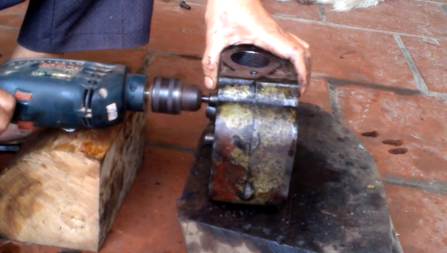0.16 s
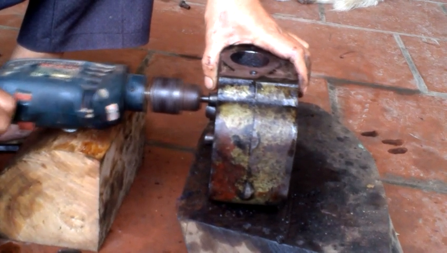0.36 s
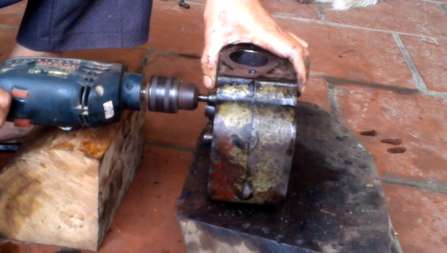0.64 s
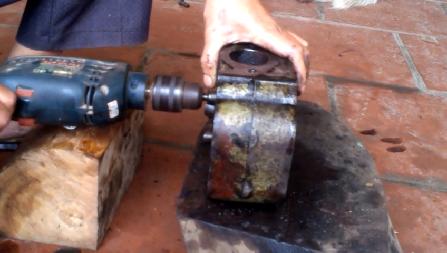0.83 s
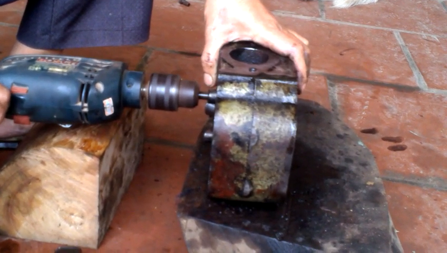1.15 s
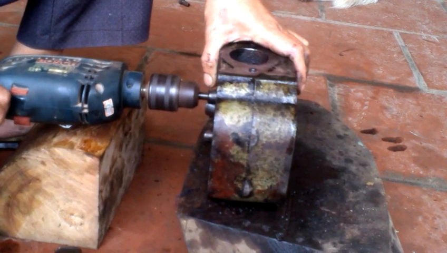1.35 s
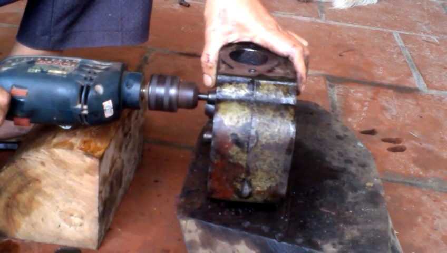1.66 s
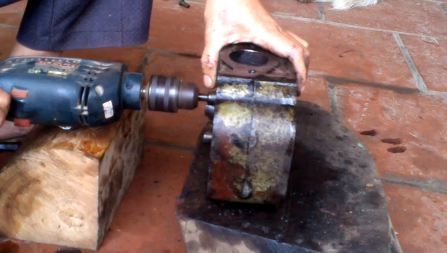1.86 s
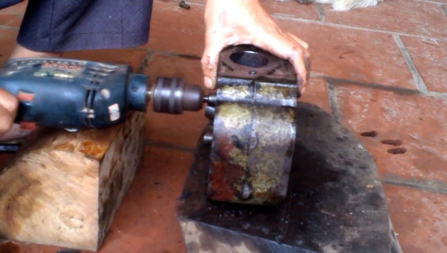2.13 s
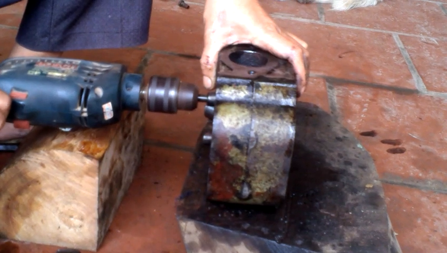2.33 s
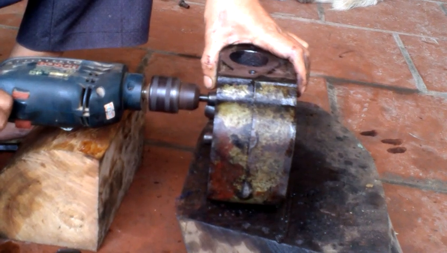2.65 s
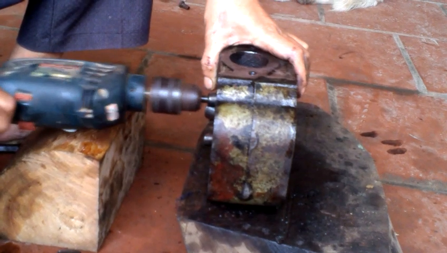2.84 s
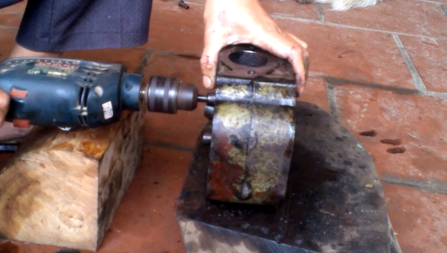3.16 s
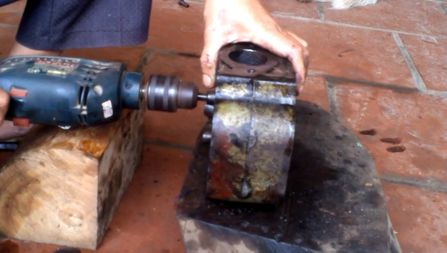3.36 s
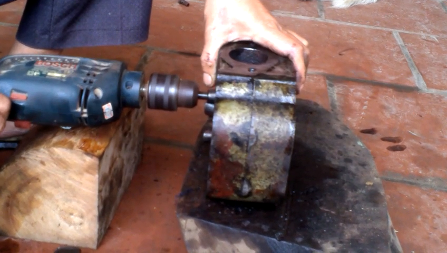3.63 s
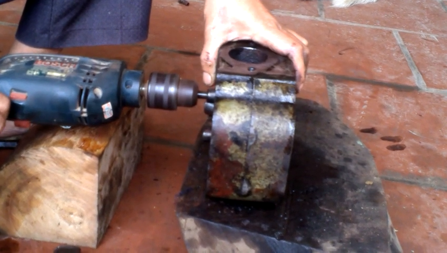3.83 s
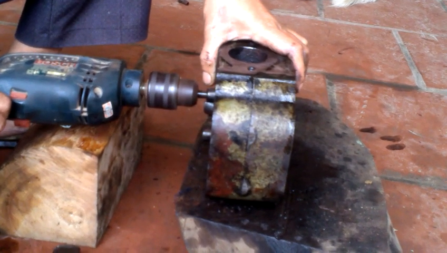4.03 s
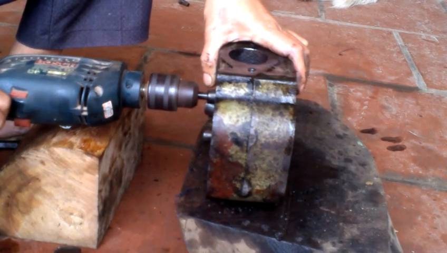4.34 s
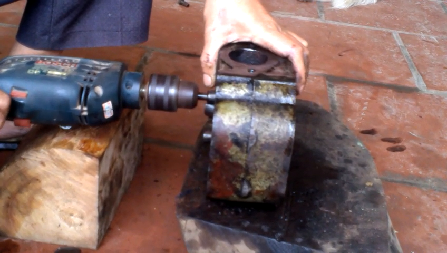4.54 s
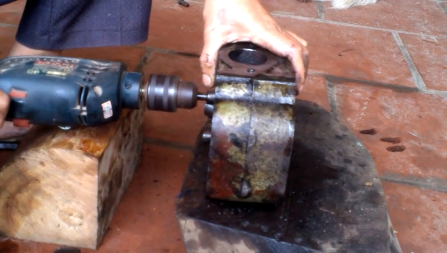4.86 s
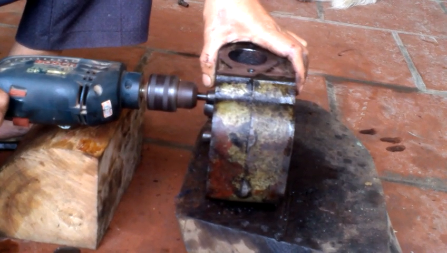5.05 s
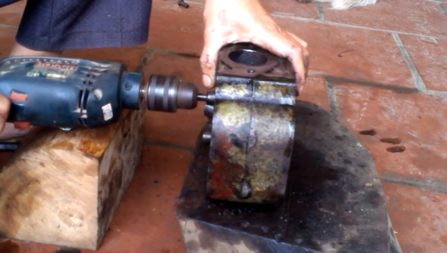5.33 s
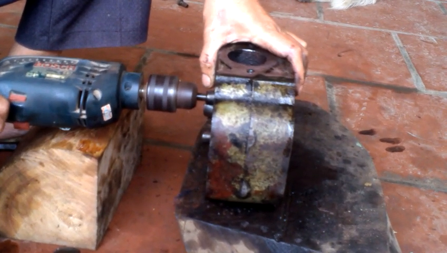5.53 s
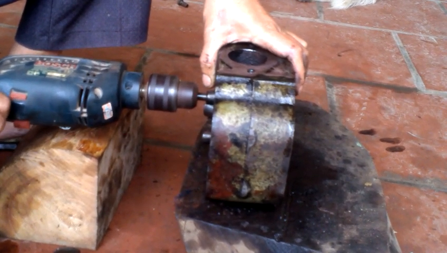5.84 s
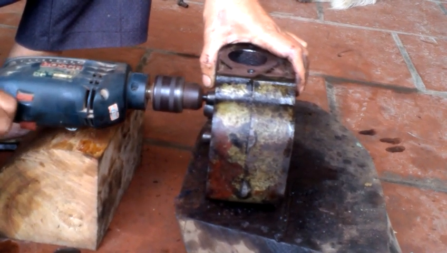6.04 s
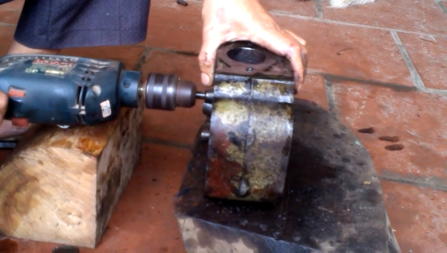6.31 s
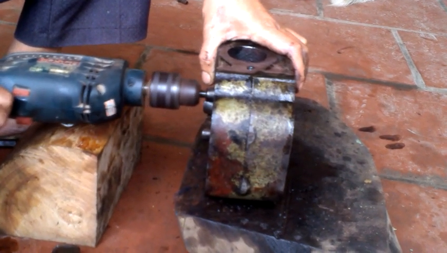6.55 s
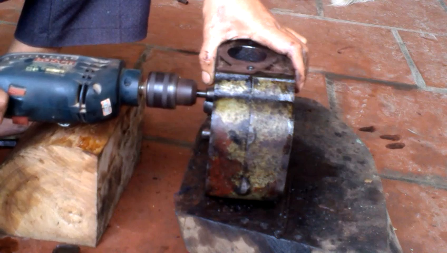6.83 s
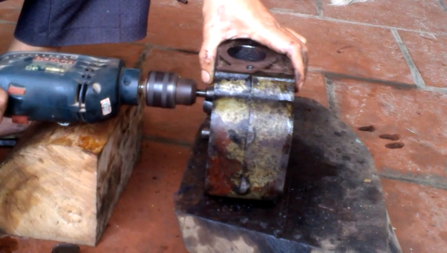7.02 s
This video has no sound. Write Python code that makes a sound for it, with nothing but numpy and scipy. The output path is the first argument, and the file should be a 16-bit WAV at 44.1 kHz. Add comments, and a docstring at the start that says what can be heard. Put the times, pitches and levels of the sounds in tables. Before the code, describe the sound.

A hand drill runs continuously close by, a harsh rushing roar with a slightly sagging whine, while a metal valve knocks lightly on its seat now and then.

```python
"""A hand drill spins a valve against its seat in a cylinder head, heard by a phone microphone close by.
Its armature whines in sine tones on multiples of its turning rate, which sags as the hand pushes.
Fan air, gears and grit roar through the housing: coloured noise that flutters and echoes briefly.
The valve knocks on its seat now and then, each blow a few fast-fading sines.
Far off, a slow engine hums in low tones over soft filtered noise."""
import sys
import numpy as np
from scipy import signal
from scipy.fft import rfft, irfft
from scipy.io import wavfile
from scipy.ndimage import uniform_filter1d

SR = 44100
rng = np.random.default_rng(int(sys.argv[2]) if len(sys.argv) > 2 else 0)


def wav_record(signal):
    """Record a signal, one row per channel, as 16-bit PCM in the file named by sys.argv[1]."""
    frames = np.transpose(np.atleast_2d(signal))
    bounded = np.clip(frames, -1, 1)
    # unit amplitude maps onto the largest positive 16-bit level
    quanta = np.round(bounded * 32767).astype(np.int16)
    wavfile.write(sys.argv[1], SR, quanta)


N = 316633
TIME = np.arange(N) / SR
FREQ = np.arange(N // 2 + 1) * SR / N + 1  # Hz, lifted by 1 so that its logarithm exists
FREE_HZ = 420  # armature turns per second from which sag is counted
PINION_TEETH, GEAR_TEETH = 4, 42


def undb(db):
    """Turn decibels into a plain factor."""
    return 10 ** (np.asarray(db) / 20)


def unit(x):
    """Scale to an rms (average strength) of 1."""
    return x / np.sqrt(np.mean(x ** 2))


def walk(rate):
    """A random wobble of rms 1: about `rate` new values per second, smoothed twice."""
    hold = int(SR / rate)
    steps = np.repeat(rng.standard_normal(N // hold + 1), hold)[:N]
    smooth = uniform_filter1d(steps, hold)
    return unit(uniform_filter1d(smooth, hold))


def follow(times, values):
    """Draw straight lines between the points of a table, one value per sample."""
    return np.interp(TIME, times, values)


def filtered(x, gain):
    """Multiply each frequency of a sound by its gain."""
    return irfft(rfft(x) * gain, N)


def bell(hz, width):
    """Bell curve over frequency: 1 at its centre, one half at half a width (Hz) to either side."""
    return 1 / (1 + (2 * (FREQ - hz) / width) ** 2)


def highpass(x, hz):
    """Take away what lies below hz."""
    return signal.sosfilt(signal.butter(3, hz, "high", fs=SR, output="sos"), x)


def tone(turns, multiple, db, slip=0):
    """A sine locked to a turning part, db is its rms level; slip in cycles blurs its pitch."""
    cycles = multiple * turns + slip + rng.random()
    return np.sqrt(2) * undb(db) * np.sin(2 * np.pi * cycles)


def chuck_turns(turns):
    """The gears slow the armature down, so the chuck makes fewer turns."""
    return turns * PINION_TEETH / GEAR_TEETH


# Pace of the far engine. Each row: time in seconds, engine cycles per second.
ENGINE_PACE = [(0, 17.15), (1, 17.3), (1.8, 17.25), (2.8, 16.9), (3.3, 16.8), (4, 16.45), (4.8, 16.72),
               (7.18, 16.5)]
# Low hum tones. Each row: multiple of the engine cycle, usual level in dB.
LOW_HUM = [(5, -81), (6, -79), (7, -80), (8, -76), (9, -82.5), (12, -83)]
# Moments when one low tone swells.
# Each row: multiple of the engine cycle, swell in dB, loudest at (seconds), spread in time (seconds).
HUM_SWELLS = [(6, 12, 1.2, 0.18), (8, 6, 1.1, .5), (6, 15, 2.16, 0.52), (12, 17, 2.8, .5),
              (7, 11, 2.8, 0.66), (8, 12, 3.2, 0.38), (5, 16, 3.75, .3), (9, 16, 3.5, .45),
              (7, 12, 4.2, .4), (7, 15, 5.55, 0.23)]
# Upper hum tones. Each row: multiple of the engine cycle, dB over the mean level of the low tones.
UPPER_HUM = [(13, 0), (14, 2), (16, 4.5), (18, 8), (19, 10)]


def engine():
    """A slow engine hums on multiples of its cycle; a boom and a rumble of noise follow its mean level."""
    cycles = np.cumsum(follow(*np.transpose(ENGINE_PACE))) / SR
    low_db = {round(multiple): db + 0 * TIME for multiple, db in LOW_HUM}
    for multiple, swell_db, loudest_s, spread_s in HUM_SWELLS:
        swell = np.exp(-((TIME - loudest_s) / spread_s) ** 2 / 2)
        low_db[round(multiple)] = low_db[round(multiple)] + swell_db * swell
    mean_db = np.mean(list(low_db.values()), axis=0)

    hum = np.zeros(N)
    for multiple, db in low_db.items():
        hum += tone(cycles, multiple, db + 2.2 * walk(4.03) + 1.2 * walk(8))
    for multiple, db in UPPER_HUM:
        hum += tone(cycles, multiple, mean_db + db + 3.1 * walk(5), slip=0.16 * walk(8))
    boom = unit(filtered(rng.standard_normal(N), bell(314.5, 31)))
    rumble = unit(filtered(rng.standard_normal(N), bell(120, 110)))
    return hum + undb(mean_db + 13) * boom + undb(mean_db + 2.5) * rumble


def yard(x, wet_db=-15, t60_s=.15):
    """Floor tiles, block and walls return a short scatter of echoes: noise that fades by 60 dB in t60_s."""
    t = np.arange(SR // 6) / SR
    fade = np.exp(-np.log(1000) * t / t60_s)
    tail = rng.standard_normal(len(t)) * fade * (t > .002)  # no echo in the first 2 ms
    tail *= undb(wet_db) / np.sqrt(np.sum(tail ** 2))
    echoes = signal.fftconvolve(x, tail)[:N]
    return (x + echoes) / np.sqrt(1 + undb(wet_db) ** 2)


# Blows of the valve on its seat. Each row: start in seconds, strength in dB.
VALVE_KNOCKS = [(0.456, -22), (1.063, -20), (2.372, -19), (2.961, -19), (4.393, -24), (4.93, -20),
                (6.199, -20), (6.817, -20.5)]
# Ringing of the cylinder head.
# Each row: pitch in Hz, level in dB against the strength of the blow, seconds to fade by 60 dB.
HEAD_RINGS = [(620, -13, .03), (760, -17, .025), (910, -8, .05), (965, -1, .065), (1350, -7, .015),
              (1950, 3, 0.013), (2420, 1, 0.0082), (3300, -1, .006)]


def knocks(rise_s=0.00027):
    """Each blow rings the head briefly, a little differently every time; it radiates little bass."""
    out = np.zeros(N)
    t = np.arange(SR // 8) / SR
    rise = 1 - np.exp(-t / rise_s)
    for start_s, strength_db in VALVE_KNOCKS:
        ring = np.zeros(len(t))
        for hz, db, t60_s in HEAD_RINGS:
            level_change, pitch_change = rng.standard_normal(2)
            varied_hz = hz * (1 + 0.0066 * pitch_change)
            fade = np.exp(-np.log(1000) * t / t60_s)
            ring += undb(db + 0.56 * level_change) * np.sin(2 * np.pi * varied_hz * t) * fade
        first = int(start_s * SR)
        out[first:first + len(t)] += undb(strength_db) * ring * rise
    return highpass(out, 500)


def chuck_tones(hz, turns):
    """The chuck runs out of true and shakes the drill at 4 and 8 times its turn, the 8th harder under load."""
    spin = chuck_turns(turns)
    fourth_db = -77 + 4 * walk(3.1)
    eighth_db = -65 + .35 * (FREE_HZ - hz) + 3.4 * walk(3) + 2.5 * walk(12)
    return tone(spin, 4, fourth_db) + tone(spin, 8, eighth_db, slip=0.076 * walk(9.2))


# Broad colour of the roar. Each row: frequency in Hz, level in dB (only the shape counts).
ROAR_COLOUR = [(40, -57), (150, -39), (400, -25.5), (800, -17), (1200, -10.5), (2200, -6), (3500, -4),
               (5300, -5.5), (6000, -13), (7500, -23), (9000, -29.5), (11000, -30), (12400, -39.5),
               (14000, -30), (16500, -30)]
# Resonances and dips of the housing. Each row: centre in Hz, width in Hz, dB over the broad colour.
HOUSING_BELLS = [(593, 123, 5), (770, 61, -7.5), (1076, 45, -2), (1254, 168, 5.5), (1430, 100, -2.5),
                 (1674, 195, 5), (1860, 46, -2), (2120, 114, -3.5), (2324, 55, -4), (2380, 110, 1.5),
                 (2700, 130, -4.5), (2930, 270, 1.5), (3425, 50, -1.5), (3880, 113, -4.5),
                 (4200, 100, -2.5), (4370, 100, 1.5), (4490, 100, -3), (4675, 180, 3), (4860, 300, 5),
                 (5100, 100, 2), (5600, 150, 1.5), (5820, 220, -3), (6260, 87, -1.5), (6440, 390, 5.5),
                 (6700, 130, -1), (7030, 150, 2.5), (10300, 950, 3.5)]


def roar(turns, flutter_db=0.56, quick_db=0.61, own_db=0.1, grit_db=0.76, chuck=0.025):
    """Fan air and grit: noise that flutters as the valve rubs, pulses once a chuck turn, housing-coloured."""
    colour_hz, colour_db = np.transpose(ROAR_COLOUR)
    db = np.interp(np.log(FREQ), np.log(colour_hz), colour_db)
    for hz, width, bell_db in HOUSING_BELLS:
        db = db + bell_db * bell(hz, width)

    # overlapping half-octave slices add up to the whole band; each wavers on its own
    spectrum = rfft(rng.standard_normal(N))
    noise = np.zeros(N)
    for hz in 250 * 2. ** np.arange(0, 6.1, .5):
        half_octaves_away = 2 * np.log2(np.clip(FREQ, 250, 16000) / hz)
        share = np.cos(np.pi / 2 * np.clip(half_octaves_away, -1, 1)) ** 2
        noise += irfft(spectrum * share, N) * undb(own_db * walk(12) + grit_db * walk(60))

    flutter = undb(flutter_db * walk(12) + quick_db * walk(30))
    pulse = 1 + chuck * np.cos(2 * np.pi * chuck_turns(turns))
    return unit(filtered(noise * pulse * flutter, undb(db)))


# Loudness of the roar. Each row: time in seconds, level in dB.
ROAR_EFFORT = [(0.0, -20), (0.12, -21), (0.6, -20), (0.68, -22), (0.9, -20.5), (0.96, -24), (1.22, -19.5),
               (1.4, -22), (1.7, -19), (3.16, -21), (3.18, -20), (4.3, -19.5), (5.0, -21), (5.02, -18),
               (5.14, -21), (5.42, -19), (6.3, -19), (6.46, -22), (6.52, -18.5), (6.56, -22.5),
               (6.6, -19.5), (6.74, -22.5), (7.0, -18.5), (7.18, -22)]


def drill_roar(turns):
    """The roar with its echoes, growing and easing with the effort."""
    return undb(follow(*np.transpose(ROAR_EFFORT))) * yard(roar(turns))


# Pace of the armature. Each row: time in seconds, armature turns per second.
ARMATURE_PACE = [(0.0, 407.7), (0.12, 409.3), (0.3, 417.6), (0.47, 421), (0.7, 416.5), (1.04, 424.5),
                 (1.4, 412.6), (1.75, 406.8), (2.2, 404.2), (2.37, 394), (2.48, 398.3), (2.61, 400),
                 (2.7, 403.8), (2.94, 414.8), (3.4, 403.5), (3.75, 398.3), (3.93, 397.9), (4.04, 400.3),
                 (4.3, 413.6), (4.55, 413.3), (4.93, 422.2), (5.4, 409), (5.77, 402.4), (6.18, 419.2),
                 (6.47, 416.5), (6.77, 424.3), (7.1, 416.2), (7.18, 416)]


def armature_speed():
    """Turns per second, with the corners rounded because the armature is heavy."""
    return uniform_filter1d(follow(*np.transpose(ARMATURE_PACE)), size=3500)


# The two main tones. Each row: time in seconds, unbalance level in dB,
# gear mesh level in dB before its throb; both also wobble.
MAIN_TONES = [(0.0, -43.5, -33), (0.2, -46, -39.5), (0.6, -44, -35), (0.95, -45.5, -49), (1.3, -45, -34),
              (1.57, -48.5, -39.5), (1.9, -43, -35), (2.25, -45, -47), (2.57, -49, -37), (2.8, -42, -54),
              (3.05, -51.5, -38), (3.27, -43, -38.5), (3.6, -53.5, -34.5), (3.85, -46, -28),
              (4.0, -46, -33), (4.1, -51, -50), (4.22, -41, -48), (4.5, -45, -42), (4.8, -43.5, -43),
              (5.25, -46.5, -36.5), (5.6, -43, -30.5), (5.85, -46.5, -38), (6.15, -42.5, -45),
              (6.35, -45, -37), (6.65, -43.5, -48.5), (7.0, -43.5, -35), (7.18, -45, -37)]
# Weaker tones. Each row: multiple of the armature turn, level in dB at free speed,
# dB more for each turn per second of sag.
WEAK_TONES = [(3, -46.5, 0), (5, -55, 0), (7, -43.5, 0), (8, -44, 0.12), (9, -43.5, -0.0642),
              (10, -43.5, 0), (11, -60, 0.15), (13, -58, -0.2)]
SLOTS, FAN_BLADES = 12, 39


def whine(hz, turns):
    """Unbalance, gear mesh, rotor slots and fan blades, each on its multiple of the turning rate."""
    times, unbalance, mesh = np.transpose(MAIN_TONES)
    unbalance_db = follow(times, unbalance) + 1.6 * walk(25)
    mesh_db = follow(times, mesh) + 1.7 * walk(10) + .8 * walk(40)
    sag = FREE_HZ - hz
    # levels at free speed, plus dB for each turn per second of sag
    sixth_db = -47 + .5 * sag + 2.6 * walk(8) + 1.5 * walk(40)
    slot_db = -42.5 + .35 * sag + 2.8 * walk(8) + 2.0 * walk(25.03)
    # the big gear runs a little out of true, so the mesh throbs once a chuck turn
    throb = 1 + 0.55 * np.cos(2 * np.pi * chuck_turns(turns))

    out = tone(turns, 1, unbalance_db)
    out += tone(turns, 2, -51.5 + 1.5 * walk(15))
    out += throb * tone(turns, PINION_TEETH, mesh_db, slip=.03 * walk(40))
    out += tone(turns, 6, sixth_db, slip=0.09 * walk(40))
    out += tone(turns, SLOTS, slot_db, slip=0.071 * walk(40))
    out += tone(turns, FAN_BLADES, -40 + 1.4 * walk(12))
    out += tone(turns, FAN_BLADES - 1, -62 + 2.5 * walk(8))
    for multiple, db, load_db in WEAK_TONES:
        out += tone(turns, multiple, db + load_db * sag + 2.7 * walk(18), slip=0.06 * walk(30))
    return out


def scene():
    """All sources reach one microphone, so both channels are alike."""
    hz = armature_speed()
    turns = np.cumsum(hz) / SR
    drill = drill_roar(turns) + chuck_tones(hz, turns) + whine(hz, turns)
    mono = engine() + knocks() + drill
    return np.array([mono, mono])


def record(dry):
    """The phone drops the deepest bass, rounds the loudest peaks a little and cuts the top steeply."""
    thin = highpass(dry, 75)
    rounded = np.tanh(1.102 * thin) / 1.098
    top_cut = signal.ellip(14, .3, 80, 15710, fs=SR, output="sos")  # passes up to 15710 Hz
    return signal.sosfilt(top_cut, rounded)


dry = scene()
out = record(dry)
wav_record(out)
```